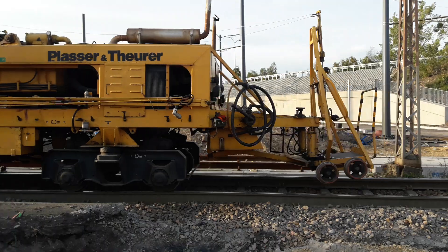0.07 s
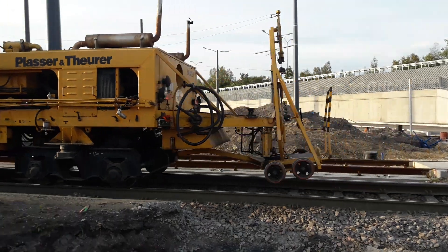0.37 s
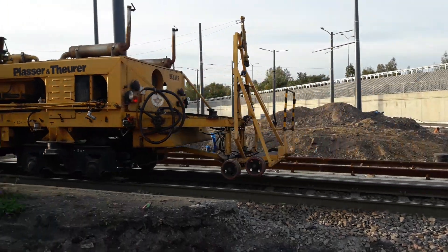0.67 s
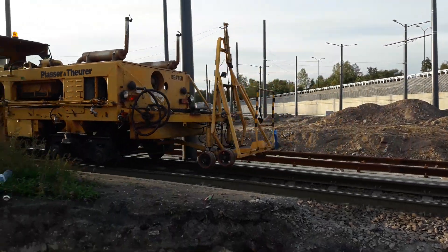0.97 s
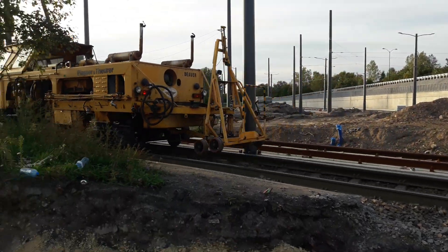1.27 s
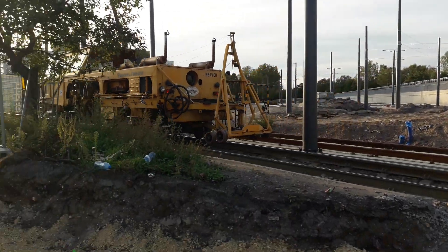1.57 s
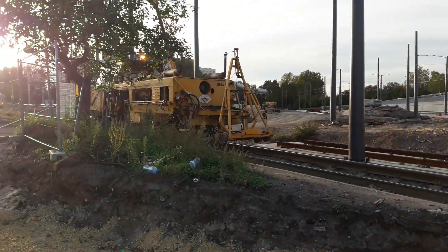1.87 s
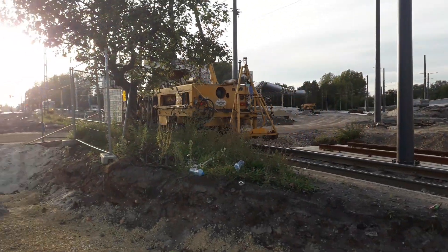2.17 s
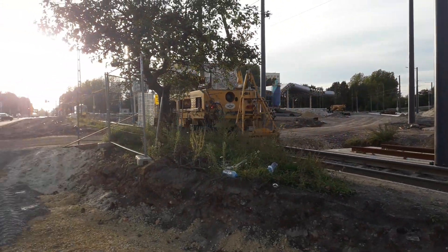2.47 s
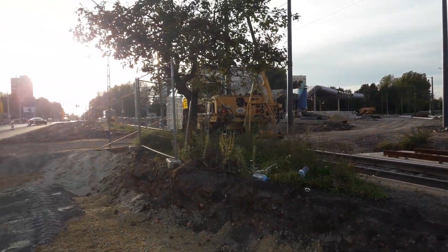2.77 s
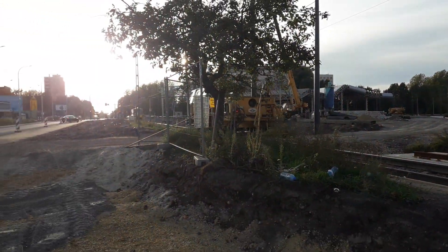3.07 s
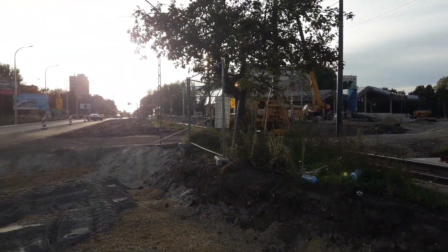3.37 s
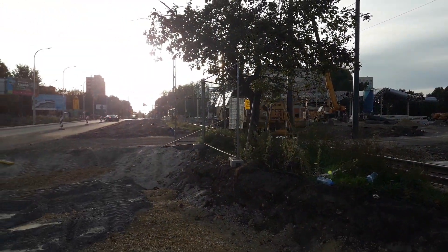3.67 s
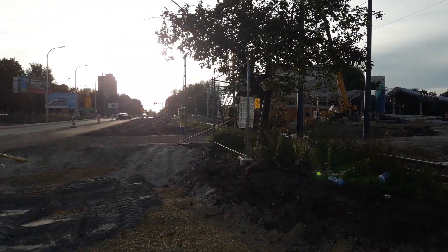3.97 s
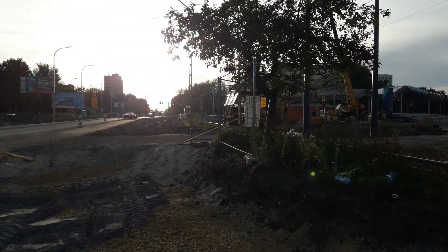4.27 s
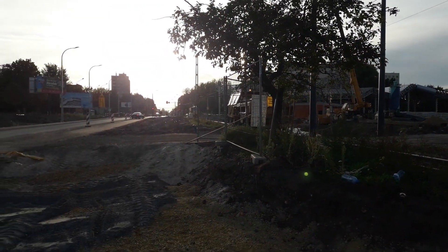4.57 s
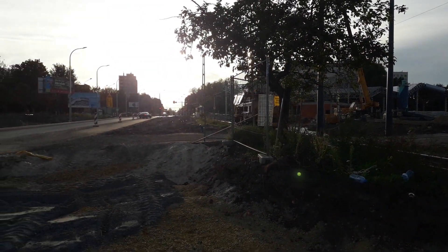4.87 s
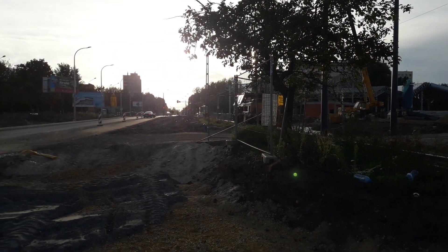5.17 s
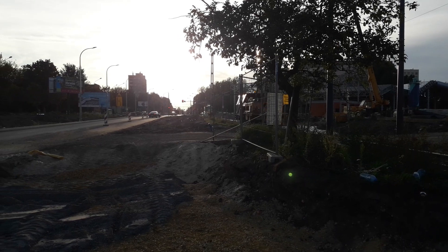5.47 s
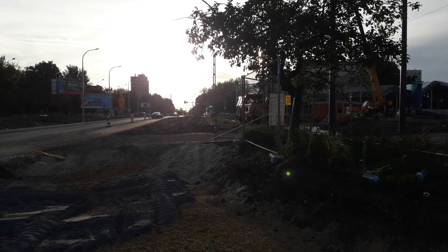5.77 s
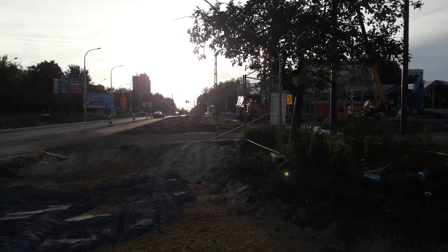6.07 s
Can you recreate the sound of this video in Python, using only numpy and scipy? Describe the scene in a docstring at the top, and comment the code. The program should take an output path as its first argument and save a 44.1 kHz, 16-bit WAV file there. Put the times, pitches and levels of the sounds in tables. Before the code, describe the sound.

A heavy track maintenance machine rolls past outdoors, close at the start, its diesel engine running fast and loud. A low exhaust boom and a throbbing roar blend with a steady hum, a rushing fan, rapid clatter, ringing metal covers and an airy hiss. The sound swells gently and its highest hiss thins as the machine moves away. At about 2.7 seconds a steel wheel scrapes briefly on the rail. Near 3.8 seconds the throttle closes: the engine falls in pitch and loudness, and the roar, fan and clatter die away, leaving a low, lumpy idle by about 5 seconds. Between 4.5 and 5.7 seconds the machine gives about five short, dull thuds, with a fainter wheel scrape at 5.3 seconds. A soft, steady wash of distant road traffic lies underneath until the end, at about 6 seconds.

```python
"""A track maintenance machine rolls past.

Its six-cylinder diesel runs fast. Each firing sends out a puff of gas that booms in the exhaust
pipe and roars in the muffler, while the engine hums, the fan rushes, the fuel pump clatters and
the intake hisses. Near four seconds the throttle closes and the engine sinks to a lumpy idle.
The machine rolls away with a few heavy thuds; wheels scrape twice, and far traffic lies beneath."""
import sys
import numpy as np
from scipy import signal
from scipy.fft import rfft, irfft
from scipy.io import wavfile
from scipy.ndimage import uniform_filter1d

SR = 44100
rng = np.random.default_rng(int(sys.argv[2]) if len(sys.argv) > 2 else 0)


def to_wav(s):
    """Save 16-bit WAV."""
    ch = np.atleast_2d(s).T  # columns
    pcm = np.round(np.clip(ch, -1, 1) * 32767)  # PCM
    wavfile.write(sys.argv[1], SR, pcm.astype(np.int16))


N = 269892
TIME = np.arange(N) / SR
HZ = np.fft.rfftfreq(N, 1 / SR)

# Engine speed. Each row: time in seconds, cycles per second (each cylinder fires once a cycle).
ENGINE_SPEED = [(0, 19.73), (2, 19.71), (3.76, 19.69), (3.9, 18.2), (4.1, 15.6), (4.35, 12.8), (4.7, 10.2),
                (5.1, 9.1), (6.12, 8.3)]
# The highest treble of the air and the ticks. Each row: frequency in Hz, relative level in dB.
FIZZ_SPECTRUM = [(6000, -35), (8000, -7), (9500, -1), (11000, 1.5), (12500, -1.5), (14500, -3.5),
                 (15700, -8)]


def crank(wander=0.00098):
    """Counts the engine cycles so far; the governor, which holds the speed, lets it wander a little."""
    speed, = curves(ENGINE_SPEED)
    return np.cumsum(speed * (1 + wander * drift(1.66))) / SR


def engine_hum(cycles, waver_db=2.0, smear=0.32):
    """The crankshaft hums at multiples of its cycle rate; the higher tones waver more."""
    # The strongest tones. Each row: multiple of the cycle rate, side-on level in dB, end-on level
    # in dB, how steeply it fades as the engine slows, depth of the slow swell in dB.
    main_tones = [(3, -33, -40, 3.2, -0.8), (6, -30.5, -30, 3, 3.5), (9, -32, -33.5, 4.5, 2),
                  (11, -28.5, -33, 1.56, -2.5), (20, -23.5, -28.5, 5.1, 1)]
    # Weaker tones that die as the throttle closes. Each row: multiple, relative level in dB.
    weak_tones = [(8, -38.5), (15, -38), (17, -32), (18, -28), (21, -30), (23, -32.5), (26, -34.5),
                  (32, -38), (36, -37), (43, -37), (45, -49), (47, -37.5), (52, -31.5)]
    load = passing_gain(side_db=1.0, end_db=-2.5, power=3.74)
    gains = [(multiple, passing_gain(side_db, end_db, power) * amp(swell_db * swell()))
             for multiple, side_db, end_db, power, swell_db in main_tones]
    gains += [(multiple, amp(db) * load) for multiple, db in weak_tones]
    tones = np.zeros(N)
    for multiple, gain in gains:
        unrest = min(multiple / 10, 1)
        phase = 2 * np.pi * (multiple * cycles + rng.random()) + unrest * smear * drift(12.3)
        tones += np.sqrt(2) * gain * amp(unrest * waver_db * drift(3.4)) * np.sin(phase)
    return tones


def exhaust(cycles, lump_db=-1.3, throb_db=0.73, blip_s=0.014):
    """Puffs of gas boom in the pipe, roar in the muffler and make it drone; the idle is lumpy."""
    # Tone of the pipe and of the muffler. Each row: frequency in Hz, relative level in dB.
    boom_spectrum = [(25, -42), (45, -28), (70, -23), (95, -5.5), (130, -2), (175, -2), (225, -3.5),
                     (280, -6), (380, -20.5), (600, -58)]
    roar_spectrum = [(180, -47), (280, -23), (320, -7), (350, -2.5), (395, -1.5), (440, 0), (500, -5),
                     (570, -15.5), (700, -28), (1100, -60)]
    # How loud each is over time. Each row: time in seconds, relative level in dB.
    boom_levels = [(0, -17), (.25, -15.5), (.75, -19.5), (1.5, -22.5), (2.1, -19), (2.5, -25.5), (3.4, -20),
                   (4, -19), (4.35, -22.5), (4.75, -22), (5.15, -27.5), (5.8, -26), (6.12, -31)]
    roar_levels = [(0, -20.5), (.55, -19.5), (1.3, -13.5), (2.05, -18), (3.15, -16), (3.6, -17),
                   (4.02, -18), (4.5, -33), (5.1, -39), (6.12, -41.5)]
    # Brief chance swells and dips in the low boom and the roar.
    # Each row: time in seconds, change of the boom in dB, change of the roar in dB.
    level_blips = [(.27, 6, -6), (.53, 0, 3), (.98, 5, 4), (1.42, -11, 2), (2.235, 7, 4), (3.592, 8, -10)]
    boom_db, = curves(boom_levels)
    roar_db, = curves(roar_levels)
    idling = (1 - revs()) / (1 - revs().min())  # 0 at full speed, 1 at the slowest
    boom_change = sum(db * bump(s, blip_s) for s, db, _ in level_blips)
    roar_change = sum(db * bump(s, blip_s) for s, _, db in level_blips)
    boom_gain = amp(boom_db - 5 + boom_change + lump_db * idling * drift(18))
    roar_gain = amp(roar_db + roar_change + throb_db * drift(9))
    boom = colour(puffs(cycles, depth=1.0, uneven_db=0.1, decay=0.33), boom_spectrum)
    # Slow puffs mostly ring the pipe's lowest note.
    idle_puffs = colour(puffs(cycles, depth=4.5, uneven_db=5.5, decay=0.13), boom_spectrum)
    pipe = amp(1) * idling ** 2 * ring(idle_puffs, hz=132, width=95)
    roar = colour(puffs(cycles, depth=0.81, uneven_db=-0.5, decay=0.75), roar_spectrum)
    drone_gain = passing_gain(side_db=0.5, end_db=-3.0, power=1.7) * amp(5.5 * swell())
    drone = drone_gain * ring(puffs(cycles, depth=1.0, uneven_db=1.5, decay=0.13), hz=395, width=36)
    return boom_gain * steadied(boom + pipe) + roar_gain * steadied(roar + drone)


def cooling_fan(cycles):
    """The fan pushes air through the vent slats, and fades as the engine slows."""
    # Tone of the rush. Each row: frequency in Hz, relative level in dB.
    spectrum = [(400, -59), (600, -13.5), (700, -5.5), (790, 0), (860, 0.5), (960, -2), (1060, 0.5),
                (1150, -5.5), (1280, -15), (1600, -14.5), (2400, -54)]
    # Its loudness at full speed. Each row: time in seconds, relative level in dB.
    levels = [(0, -17), (.8, -14), (1.45, -16.5), (2.35, -19), (2.85, -16.5), (3.25, -20.5), (3.75, -22)]
    level_db, = curves(levels)
    rush = colour(puffs(cycles, depth=0.11, uneven_db=1.3, decay=0.81), spectrum)
    return amp(level_db - 2) * revs() ** 2.77 * rush


def fuel_pump(cycles):
    """The pump that injects the fuel clatters at every firing."""
    # Tone of the clatter. Each row: frequency in Hz, relative level in dB.
    spectrum = [(800, -35), (1270, -9), (1450, 0), (1620, 4.5), (1800, -1), (1950, -2), (2130, -8),
                (2330, 2.5), (2600, 1.5), (2820, -4), (3150, -7), (3500, -9), (3900, -12.5), (5200, -78)]
    clatter = colour(puffs(cycles, depth=0.86, uneven_db=0.58, decay=0.15), spectrum)
    return passing_gain(side_db=-19, end_db=-22, power=3.02) * clatter


def metalwork(cycles, beam_deg=8.5):
    """Firing knocks ring the engine block and its covers; each cover is heard as it faces us."""
    # Steady rings of the block. Each row: pitch in Hz, width in Hz, level in dB.
    block_rings = [(775, 116, -43), (2540, 92, -50), (3540, 220, -52), (6630, 370, -62.5), (7400, 210, -68)]
    # Covers and pipes, each beaming its ring one way. Each row: pitch in Hz, width in Hz,
    # level at full speed in dB, direction in degrees from side-on towards the tail.
    cover_rings = [(227, 29, -27, 59.6), (300, 74, -24.5, 7.2), (495, 60, -26, 19), (763, 120, -29.5, 59),
                   (882, 85, -20, 27.6), (940, 81, -26, 45), (1072, 46, -19, 0.91), (1540, 280, -30, 52),
                   (1946, 98, -30.5, 52.5), (2460, 180, -29.5, 32), (2577, 100, -28.5, 60.6),
                   (3520, 68, -35, 44), (4350, 280, -34, 40), (4830, 540, -34.5, 47.5),
                   (5420, 480, -36.5, 28), (6670, 410, -41.5, 48.6)]
    knocks = puffs(cycles, depth=0.48, uneven_db=0.3, decay=0.1)
    angle = np.degrees(bearing())
    block = sum(amp(db) * ring(knocks, hz, width) for hz, width, db in block_rings)
    covers = np.zeros(N)
    for hz, width, db, direction in cover_rings:
        facing = np.exp(-((angle - direction) / beam_deg) ** 2)
        covers += amp(db) * facing * ring(knocks, hz, width)
    return block + revs() ** 3.9 * covers


def intake(cycles, flutter_db=1.2):
    """Air flutters and hisses into the engine; fizz and ticks fade first as the machine rolls away."""
    # Tone of the hiss. Each row: frequency in Hz, relative level in dB.
    hiss_spectrum = [(2800, -8), (3800, 1), (4200, 1.5), (4700, -1), (5400, -2), (6100, -4.5), (6600, -6),
                     (7000, -12), (7350, -10.5), (7900, -21.5), (9500, -23)]
    hiss_air = puffs(cycles, depth=0.3, uneven_db=-0.1, decay=0.29) * amp(flutter_db * drift(60))
    fizz_air = puffs(cycles, depth=0.2, uneven_db=-0.7, decay=0.2) * amp(flutter_db * drift(45))
    hiss = passing_gain(side_db=-28, end_db=-32, power=2.8) * colour(hiss_air, hiss_spectrum)
    fizz = colour(fizz_air, FIZZ_SPECTRUM) + ticks()
    return bushes() * (hiss + passing_gain(side_db=-40, end_db=-53, power=3.1) * fizz)


def frame_thuds(pitch_hz=125, length_s=0.038):
    """Each jolt sets the heavy frame swinging a few times."""
    # The jolts. Each row: start in seconds, relative level in dB.
    jolts = [(4.506, -10), (4.527, -18), (4.663, -11), (4.96, -10.5), (5.201, -11), (5.722, -11)]
    thuds = np.zeros(N)
    for start, db in jolts:
        age = np.clip(TIME - start, 0, length_s)
        envelope = np.sin(np.pi * (age / length_s) ** 0.54) ** 2
        thuds += amp(db - 8) * envelope * np.sin(2 * np.pi * pitch_hz * age)
    return thuds


def wheels():
    """Steel wheels rub briefly on the rail, each rub ringing at its own pitch."""
    # The rubs. Each row: middle in seconds, spread in seconds, pitch in Hz, width in Hz, level in dB.
    scrapes = [(2.67, 0.054, 3900, 1300, -27), (5.3, 0.036, 2605, 100, -41)]
    rub = rng.standard_normal(N)
    return sum(amp(db) * bump(s, spread) * ring(rub, hz, width) for s, spread, hz, width, db in scrapes)


def ticks(per_s=22, fade_s=0.0044):
    """Loose fittings tick faintly at random."""
    strikes = (rng.random(N) < per_s / SR) * rng.uniform(.3, 1, N)
    envelope = signal.lfilter([1], [1, -np.exp(-1 / (fade_s * SR))], strikes)
    return amp(-12) * colour(envelope * rng.standard_normal(N), FIZZ_SPECTRUM)


def traffic(level_db=-33.5):
    """Far road traffic blends into a steady, low wash."""
    # Tone of the wash. Each row: frequency in Hz, relative level in dB.
    spectrum = [(20, -27), (40, -22), (70, 0), (136, 4.5), (290, -12.5), (420, -28.5), (580, -15.5),
                (850, -8.5), (1300, -12.5), (2100, -17), (3200, -22), (5000, -31), (6500, -38), (8200, -49),
                (15500, -48)]
    return amp(level_db) * colour(rng.standard_normal(N), spectrum)


def puffs(cycles, depth, uneven_db, decay, cylinders=6):
    """Noise that jumps at each firing; one half of the cycle hits harder than the other."""
    since_firing = (cycles * cylinders) % 1
    blow = 1 + depth * np.exp(-since_firing / decay)
    return unit(rng.standard_normal(N) * blow * amp(uneven_db * np.cos(2 * np.pi * cycles)))


def revs():
    """Engine speed as a share of full speed."""
    speed, = curves(ENGINE_SPEED)
    return speed / speed.max()


def swell(crest_s=1.4, period_s=1.76):
    """A slow wave from -1 to 1 that makes the engine's note louder and softer."""
    return np.cos(2 * np.pi * (TIME - crest_s) / period_s)


def bearing(roll_m_per_s=2.94, distance_m=8.9, side_on_s=-0.1):
    """The angle to the machine in radians: zero when side-on, growing as it rolls away."""
    return np.arctan(roll_m_per_s * (TIME - side_on_s) / distance_m)


def passing_gain(side_db, end_db, power):
    """Slides from the side-on level towards the end-on one, and falls as the engine slows."""
    return amp(side_db + (end_db - side_db) * np.sin(bearing())) * revs() ** power


def bushes(loss_db=-3.5, at_s=3.58, spread_s=0.2):
    """The share of treble that gets through as the machine slips behind a tree and bushes."""
    return amp(loss_db * (1 + np.tanh((TIME - at_s) / spread_s)) / 2)


def amp(db):
    """Turns decibels into a gain."""
    return 10 ** (np.asarray(db) / 20)


def unit(x):
    """Scales a sound to an average level (rms) of one."""
    return x / np.sqrt(np.mean(x ** 2) + 1e-20)


def curves(rows):
    """Turns each column after the times into a curve over time."""
    times, *columns = np.transpose(rows)
    return [np.interp(TIME, times, column) for column in columns]


def colour(x, spectrum):
    """Shapes the lows and highs of a sound, at a level of one."""
    hz, db = np.transpose(spectrum)
    gain = amp(np.interp(np.log(HZ + 1), np.log(hz), db, right=-90))
    return unit(irfft(rfft(x) * gain, N))


def ring(x, hz, width):
    """Makes a sound ring around one pitch, at a level of one."""
    return unit(irfft(rfft(x) / (1 + 1.3j * (HZ - hz) / width) ** 2, N))


def drift(rate_hz):
    """A random wobble, up to about the given rate."""
    return unit(irfft(rfft(rng.standard_normal(N)) / (1 + (HZ / rate_hz) ** 4), N))


def bump(middle_s, spread_s):
    """A smooth rise and fall around one moment."""
    return np.exp(-((TIME - middle_s) / spread_s) ** 2)


def steadied(x, span_s=0.067):
    """Holds the level at one, so that only the quick roughness stays."""
    size = int(span_s * SR)
    power = uniform_filter1d(uniform_filter1d(x ** 2, size), size)
    return x / np.sqrt(np.abs(power) + 1e-12)


def scene():
    """The machine over faint traffic, in one channel."""
    cycles = crank()
    engine = engine_hum(cycles) + exhaust(cycles) + cooling_fan(cycles) + fuel_pump(cycles)
    engine += metalwork(cycles) + intake(cycles)
    return (engine + traffic() + wheels() + frame_thuds())[None]


def record(dry, low_hz=30, top_hz=15720):
    """Cuts the deepest bass, rounds off loud peaks, fades both ends and cuts the highest treble."""
    thinned = signal.sosfilt(signal.butter(2, low_hz, "highpass", fs=SR, output="sos"), dry)
    rounded = thinned / (1 + thinned ** 8) ** (1 / 8)
    faded = rounded * signal.windows.tukey(N, .001)
    treble_cut = signal.firwin(1023, top_hz, window=("kaiser", 9), fs=SR)
    return signal.oaconvolve(faded, treble_cut[None], "same")


dry = scene()
out = record(dry)
to_wav(out)
```